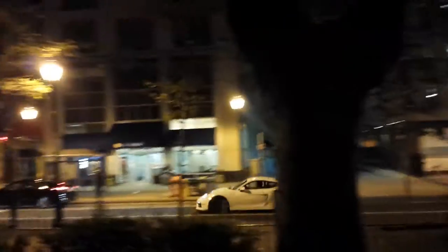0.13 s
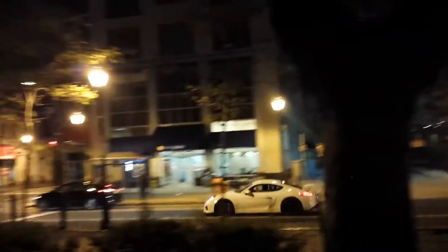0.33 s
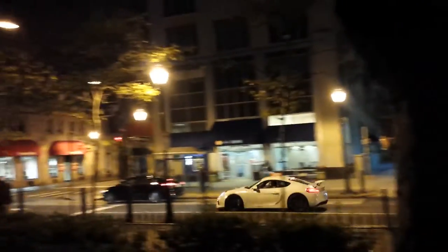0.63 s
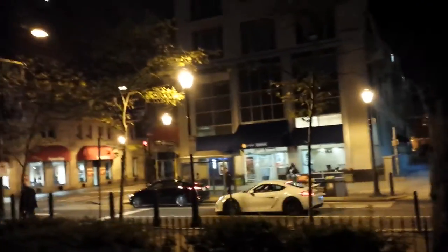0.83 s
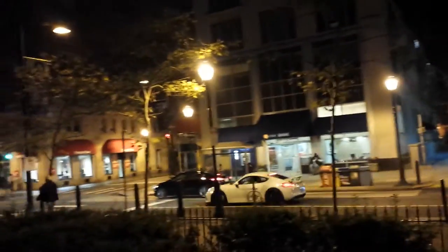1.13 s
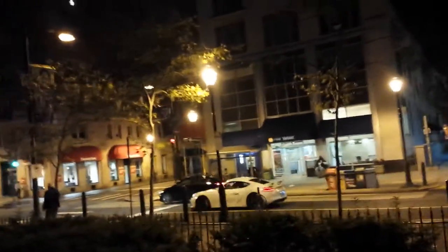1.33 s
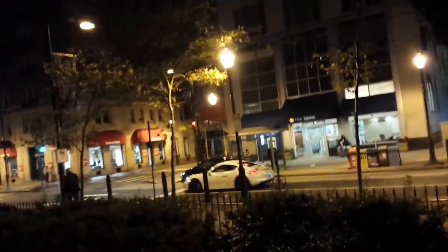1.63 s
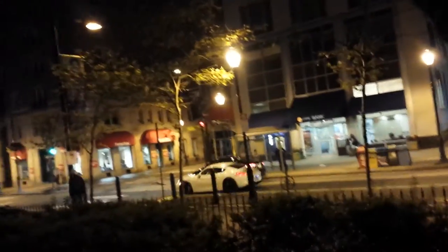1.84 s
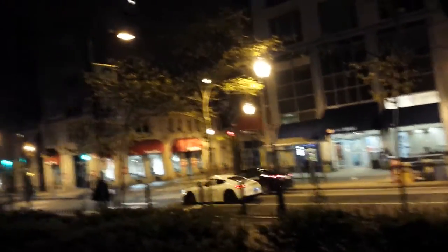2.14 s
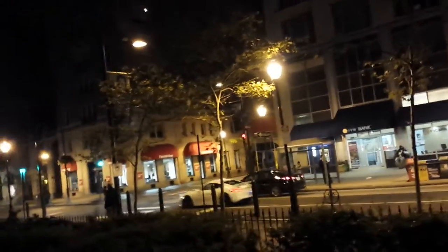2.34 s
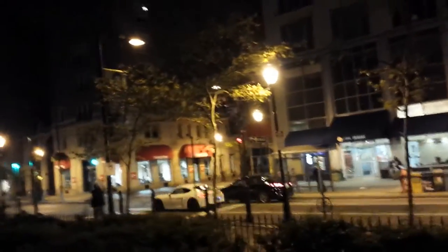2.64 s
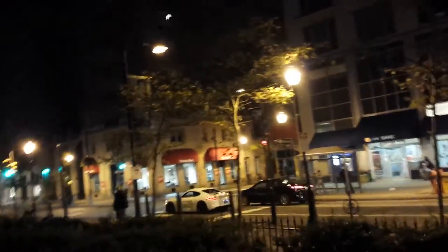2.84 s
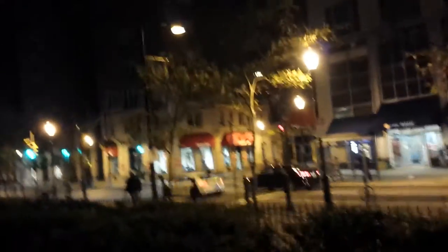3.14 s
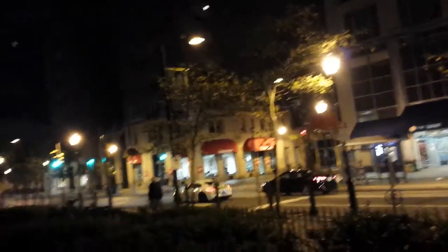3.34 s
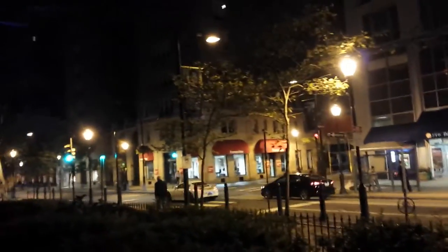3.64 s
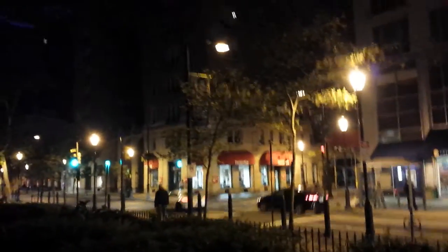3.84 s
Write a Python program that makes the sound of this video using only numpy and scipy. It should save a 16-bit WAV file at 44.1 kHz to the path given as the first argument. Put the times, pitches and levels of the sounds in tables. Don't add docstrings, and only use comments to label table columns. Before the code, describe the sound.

Quiet night street hum and tyre wash fade in, a faint cloth brush on the left, then a sports car barks three times, pops, and accelerates with climbing growl, echoing off buildings near a handheld stereo microphone.

```python
import sys
import numpy as np
from scipy import signal
from scipy.fft import rfft, irfft
from scipy.io import wavfile

SR = 44100
rng = np.random.default_rng(int(sys.argv[2]) if len(sys.argv) > 2 else 0)


def volts_from_db(level):
    exponent = np.asarray(level, float) / 20
    return 10 ** exponent


def to_wav(sig):
    pcm = np.clip(np.atleast_2d(sig), -1, 1) * 32767
    pcm = np.round(pcm).astype(np.int16)
    wavfile.write(sys.argv[1], SR, pcm.T)


N = 176400

# t/s, firing rate f/Hz, throttle level/dB
ENGINE = [(.4, 60.3, -38), (1.74, 48.12, -47), (1.81, 57.1, -26), (1.87, 69.77, -20), (1.95, 73.14, -27),
          (2.02, 66.33, -41), (2.14, 46.84, -41), (2.21, 48.52, -30.5), (2.36, 73.05, -26),
          (2.43, 79.06, -27.5), (2.47, 66.04, -40.5), (2.58, 56.14, -30), (2.68, 66.67, -26.5),
          (2.75, 63, -29.5), (2.83, 57.63, -29.5), (3.2, 65.32, -25), (3.6, 73.5, -23), (4, 83.68, -23.5)]
# multiple, level/dB
ORDERS = [(1, -1), (2, 2), (3, -10), (4, -9)]
CYLINDERS = [7, 2.5, 0, 6, 2, -3.5]
# f/Hz, level/dB
TAILPIPE = [(45, 5), (75, 1.6), (105, 1.5), (143, 0.5), (153, 6.5), (175, 6.5), (260, 4.5), (340, -0.5)]
# f/Hz, width/Hz, depth/dB
NULLS = [(58.7, 0.61, 3), (64.29, 0.62, 2), (76.47, 2.4, 3.5), (135.34, 2, 5.5), (142.3, 1.4, 7),
         (204, 10.5, 8), (296, 11, 3)]
# f/Hz, width/Hz, level/dB
EXHAUST_BOX = [(312, 68, 4.5), (420, 139, -1.6), (804, 84, -4.5), (1080, 150, -9), (1600, 335, -13.5)]
# firing rate f/Hz, span/Hz, pitch f/Hz, width/Hz, level/dB
PANELS = [(71.5, 2.16, 789, 106, -6.5), (67.2, 0.86, 1570, 57, -12), (76, 2.6, 1030, 130, -11.5),
          (60.4, 5.7, 300, 12, -7), (63, 5.3, 430, 14, -7.5), (60.3, 0.44, 890, 32, -7)]
# f/Hz, level/dB per Hz
GAS_RUSH = [(120, -36), (200, -11.5), (409, 2.5), (679, -10.5), (997, -8), (2800, -23.5), (6810, -18),
            (10900, -43.5), (13000, -47)]
# t/s, peak level/dB
RATTLES = [
    (1.8366, -32),
    (1.8669, -19),
    (1.8811, -22),
    (1.895, -21),
    (1.921, -31),
    (2.555, -29.5),
    (2.6367, -27),
]
# f/Hz, level/dB, t60/s
SHIELD = [(3950, -7.5, 0.019), (4900, -9, 0.013), (5560, 1, 0.013), (6050, -13, 0.021)]
# t/s, peak level/dB, f/Hz
POPS = [(1.806, -16, 420), (1.8375, -18, 700), (1.8662, -13.5, 476), (1.893, -6.5, 523),
        (1.912, -21.5, 1300), (1.932, -19.5, 1120), (1.943, -18, 420), (2.344, -21.5, 1180),
        (2.627, -24, 600), (2.914, -30, 495), (3.056, -39, 493), (3.114, -24.5, 1250), (3.2, -17.5, 615),
        (3.447, -24, 780), (3.474, -27, 793.8), (3.502, -18.5, 790), (3.585, -19, 716), (3.624, -16, 396),
        (3.663, -12, 399.7), (3.703, -17, 605.4), (3.842, -26, 910), (3.88, -24, 700.4),
        (3.916, -25, 700.8)]
# t/s, f/Hz, peak level/dB, t60/s
TINKS = [
    (2.544, 2120, -31, 0.055),
    (2.548, 1430, -35, .06),
    (2.543, 4610, -35, .1),
    (2.945, 1600, -32.5, 0.1),
    (3.01, 1600, -30.5, 0.077),
    (3.378, 1560, -25.5, 0.11),
]
PUFF_TIMES = [1.885, 1.96, 2.36, 2.68, 3.362, 3.893, 1.16, 2.9, 1.715, 3.17, 1.99]
# half length/s, level/dB, sizzle level/dB
PUFFS = [(0.04, -39, -70), (0.11, -34, -69), (0.11, -38, -68), (0.083, -37, -74), (0.028, -24, -43),
         (0.016, -37, -54), (.03, -47, -55), (0.031, -61, -58), (0.025, -48, -56), (0.032, -60, -61),
         (.025, -46, -57)]
# f/Hz, level/dB per Hz
PUFF_HISS = [(1500, 14), (3000, 4), (5800, 12.5), (8000, 1.5), (10500, -49), (12500, -36)]
# start t/s, length/s, level/dB
SQUEAKS = [
    (0.803, 0.096, -48),
    (2.397, 0.1, -47.5),
    (3.05, 0.12, -50),
    (3.247, 0.11, -48),
    (3.5, .08, -61),
    (3.683, 0.09, -51),
    (3.933, 0.077, -50),
]
# t/s, peak level/dB, left-right level/dB
TICKS = [
    (1.5995, -24, -2),
    (3.89, -34, -6),
]
# t/s, f/Hz, level/dB
COASTING = [
    [(.45, 70, -55), (.75, 67.8, -46), (1.0, 61, -41), (1.12, 56, -59)],
    [(1.12, 78, -71), (1.2, 78.1, -31.5), (1.42, 76, -41), (1.62, 63.8, -54.5), (1.78, 63, -41)],
    [(.5, 141.8, -63), (.9, 138.5, -41), (1.02, 138, -30), (1.13, 148, -29.5), (1.22, 141, -74)],
    [(.6, 122.3, -64), (.82, 121.3, -36.5), (1.25, 119.4, -49), (1.7, 115, -64), (1.8, 116, -47)],
]
# f/Hz, level/dB per Hz
STREET = [(15, -45), (25, -67), (55, -7), (130, -2.5), (411, -16.5), (534, -15.5), (3160, -30), (6580, -30),
          (13000, -87)]
# f/Hz, width/Hz, level/dB
HOLLOW = [(284, 17.4, -42), (408, 30, -42), (194, 36, -41)]
# f/Hz, likeness (-1 to 1)
LIKENESS = [(60, 1), (130, 0.95), (280, 0.87), (620, 0.56), (1350, -0.22), (2930, 0.086), (6370, 0.069),
            (13900, -0.58)]
# f/Hz, left-right level/dB
PORTS = [(60, -1.5), (110, -2), (200, -2.0), (370, -2.5), (670, -1), (1230, -2.0), (2260, -1), (4140, -3.5),
         (7570, -8.5), (13900, -14.5)]

UPPER_FADE_HZ, UPPER_FADE_DB_PER_HZ = 68.9, 2.5
PIPE_BUILD_S, NULL_LAG_S = 0.091, 0.038
BARK_DB, BARK_SPREAD_DB, BARK_JITTER, BARK_CUT_HZ = -7, 3.5, 0.16, 2060
SNARL_DB_PER_HZ_PER_S, SNARL_LAG_S = 0.027, 0.028
PANEL_BEAT = 1.9
RUSH_DB, RUSH_FOLLOWS, RUSH_GATE = -7, 1.19, 0.4
POP_T60_S = 0.016
SQUEAK_HZ, SQUEAK_WIDTH_HZ, SQUEAK_EDGE_S, SQUEAK_TAIL_S, SQUEAK_TAIL = 10570, 220, 0.022, 0.17, 0.63
RUSTLE_S, RUSTLE_HALF_S, RUSTLE_PER_S, RUSTLE_DB, RUSTLE_LEFT_DB = 1.21, 0.12, 900, -46, 10
STREET_DB = -29.5
TYRE_S, TYRE_HALF_S, TYRE_DB, TYRE_BAND_HZ = 0.56, 0.86, -36.5, [637, 1590]
TYRE_HISS_DB, TYRE_HISS_HZ, TYRE_HISS_LAG_S = -9, 5800, 0.16
FACADE_DB, FACADE_T60_S, FACADE_LOW_HZ = -1.5, 0.42, 650
TOP_CUT_HZ = 11600
FADE_START_S, FADE_S, MIC_LOW_HZ = 0.419, 0.29, 32.2


def engine():
    rate, throttle_db = in_time(ENGINE)
    turns = np.cumsum(rate) / SR
    barks = exhaust_barks(rate, throttle_db, turns) + box_panels(rate, throttle_db, turns)
    tones = volts_from_db(throttle_db) * pipe_tones(rate, turns)
    return -tones + barks + facades(barks) + gas_rush(throttle_db, turns)


def pipe_tones(rate, turns):
    tones = 0
    for k, db in ORDERS:
        pipe_db = lag(at_hz(TAILPIPE, k * rate), PIPE_BUILD_S)
        lost_db = lag(nulls_db(k * rate), NULL_LAG_S)
        if k > 2:
            lost_db = lost_db + UPPER_FADE_DB_PER_HZ * np.maximum(rate - UPPER_FADE_HZ, 0)
        wobble_db = (1.0 if k <= 2 else 2.5) * drift(9.3)
        tones = tones + volts_from_db(db + pipe_db - lost_db + wobble_db) * np.cos(2 * np.pi * k * turns)
    return tones


def exhaust_barks(rate, throttle_db, turns):
    count = np.floor(2 * turns + BARK_JITTER * drift(40)).astype(int)
    fired = np.diff(count, prepend=0) > 0
    chance_db = BARK_SPREAD_DB * np.clip(rng.standard_normal(N), -2, 1.5)
    knocks = fired * volts_from_db(np.array(CYLINDERS)[count % 6] + chance_db)
    knocks = signal.lfilter(*signal.butter(2, BARK_CUT_HZ, fs=SR), knocks)
    box = 0
    for k, (hz, width_hz, db) in enumerate(EXHAUST_BOX):
        box = box + (-1) ** k * volts_from_db(db) * peak(knocks, hz, width_hz)
    climb = np.maximum(np.gradient(rate) * SR, 0)
    snarl_db = SNARL_DB_PER_HZ_PER_S * lag(climb, SNARL_LAG_S)
    return volts_from_db(throttle_db + BARK_DB + snarl_db) * rms_one(box)


def box_panels(rate, throttle_db, turns):
    air = rng.standard_normal(N) * np.exp(PANEL_BEAT * np.cos(2 * np.pi * turns) / 2)
    out = 0
    for speed, span, hz, width_hz, db in PANELS:
        awake = np.exp(-((rate - speed) / span) ** 2)
        out = out + volts_from_db(throttle_db + db) * awake * rms_one(peak(air, hz, width_hz))
    return out


def gas_rush(throttle_db, turns):
    gate = 1 + RUSH_GATE * np.cos(2 * np.pi * turns)
    level_db = RUSH_DB - 18.5 + RUSH_FOLLOWS * (throttle_db + 21.5)
    return volts_from_db(level_db) * gate * banded_noise(GAS_RUSH, patchy_db=1, low_hz=160.8)


def clatter():
    out = np.zeros(N + SR)
    rattle_s, rattle_db = np.transpose(RATTLES)
    for hz, level_db, t60 in SHIELD:
        clicks = np.zeros(N + SR)
        clicks[(rattle_s * SR).astype(int)] = volts_from_db(rattle_db + level_db + rng.normal(0, 2.0, len(rattle_s)))
        out += ring(clicks, hz, t60)
    click = np.arange(SR // 4) == 0
    for s, db, hz in POPS:
        octaves = ring(click, hz * 2, POP_T60_S) + ring(click, hz * 0.5, POP_T60_S)
        out[int(s * SR):][:len(click)] += volts_from_db(db) * (ring(click, hz, POP_T60_S) + 0.5 * octaves)
    soft_start = lag(np.ones(len(click)), 0.0019)
    for s, hz, db, t60 in TINKS:
        out[int(s * SR):][:len(click)] += volts_from_db(db) * soft_start * ring(click, hz, t60)
    return out[:N] + facades(out[:N])


def puffs():
    high = signal.butter(4, 10000, "high", fs=SR, output="sos")
    sizzle = rms_one(signal.sosfilt(high, rng.standard_normal((2, N))))
    body = without_top(banded_noise(PUFF_HISS, patchy_db=-0.5, low_hz=1226.0))
    out = 0
    for s, (half, db, sizzle_db) in zip(PUFF_TIMES, PUFFS):
        out = out + bump(s, half) * (volts_from_db(db) * body + volts_from_db(sizzle_db) * sizzle)
    return out


def squeaks():
    t = np.arange(N) / SR
    gain = 0
    for s, length, db in SQUEAKS:
        inside_s = np.minimum(t - s, s + length - t)
        gain = gain + volts_from_db(db) * np.clip(inside_s / SQUEAK_EDGE_S + 0.5, 0, 1)
    gain = np.maximum(gain, SQUEAK_TAIL * 2 * lag(gain, SQUEAK_TAIL_S))
    whistle = rng.standard_normal((2, N))
    for _ in range(2):
        whistle = peak(whistle, SQUEAK_HZ, SQUEAK_WIDTH_HZ)
    return 0.83 * gain * rms_one(whistle)


def handling():
    grains = (rng.random(N) < RUSTLE_PER_S / SR) * rng.choice([-1, 1], N)
    grains = grains * volts_from_db(3.8 * np.minimum(rng.exponential(1, N), 4))
    sides = volts_from_db(np.array([[RUSTLE_LEFT_DB], [-RUSTLE_LEFT_DB]]) / 2)
    cloth = rms_one(without_top(peak(grains, 6400.0, 2500.0))) * sides
    ticks = np.zeros((2, N))
    for s, db, pan_db in TICKS:
        ticks[:, int(s * SR)] = volts_from_db(db + 4.5 + np.array([pan_db, -pan_db]) / 2)
    return volts_from_db(RUSTLE_DB) * bump(RUSTLE_S, RUSTLE_HALF_S) * cloth + peak(ticks, 12500.0, 6000.0)


def coasting():
    out = 0
    for rows in COASTING:
        start = (rows[0][0] - 0.05, rows[0][1], -90)
        end = (rows[-1][0] + 0.05, rows[-1][1], -90)
        hz, db = in_time([start] + list(rows) + [end])
        out = out + volts_from_db(db + 3 + 1.5 * drift(7)) * np.sin(2 * np.pi * np.cumsum(hz) / SR)
    return out


def traffic():
    hum = volts_from_db(STREET_DB) * banded_noise(STREET, patchy_db=1.06, low_hz=21.77)
    hollow = 0
    for hz, width_hz, db in HOLLOW:
        hollow = hollow + volts_from_db(db + 0.47 * drift(1.2)) * rms_one(peak(rng.standard_normal(N), hz, width_hz))
    band = signal.butter(2, TYRE_BAND_HZ, "band", fs=SR, output="sos")
    left, right, shared = signal.sosfilt(band, rng.standard_normal((3, N)))
    roar = rms_one(np.array([left, right]) + 0.27 * shared)
    hiss = rms_one(peak(rng.standard_normal((2, N)), TYRE_HISS_HZ, 1400.0))
    tyres = volts_from_db(TYRE_DB) * bump(TYRE_S, TYRE_HALF_S) * roar
    tyres += volts_from_db(TYRE_DB + TYRE_HISS_DB) * bump(TYRE_S + TYRE_HISS_LAG_S, TYRE_HALF_S) * hiss
    return hum + hollow + tyres


def facades(x):
    t = np.arange(SR // 3) / SR
    sparse = rng.random((2, len(t))) < 0.02
    echoes = rng.standard_normal((2, len(t))) * sparse * volts_from_db(-60 * t / FACADE_T60_S)
    echoes /= np.sqrt((echoes ** 2).sum(axis=1, keepdims=True))
    bright = signal.lfilter(*signal.butter(2, FACADE_LOW_HZ, "high", fs=SR), x)
    return volts_from_db(FACADE_DB) * signal.fftconvolve(bright[None], echoes, axes=1)[:, :N]


def nulls_db(hz):
    return sum(depth_db * np.exp(-((hz - centre) / width) ** 2) for centre, width, depth_db in NULLS)


def without_top(x):
    return signal.sosfilt(signal.butter(8, TOP_CUT_HZ, fs=SR, output="sos"), x)


def banded_noise(spectrum, patchy_db, low_hz):
    edges = low_hz * 2 ** np.arange(0, np.log2(15000 / low_hz), 0.5)
    white = rng.standard_normal((2, 2, N))
    out = 0
    for k, (low, high) in enumerate(zip(edges, edges[1:])):
        band = signal.butter(2, [low, high], "band", fs=SR, output="sos")
        mid, side = signal.sosfilt(band, white[k % 2])
        hz = np.sqrt(low * high)
        alike = np.clip(at_hz(LIKENESS, hz), -1, 1)
        stereo = np.sqrt(1 + alike) * mid + np.sqrt(1 - alike) * side * [[1], [-1]]
        out = out + volts_from_db(at_hz(spectrum, hz) + patchy_db * drift(6.4)) * stereo
    return rms_one(out)


def peak(x, hz, width_hz):
    r = np.exp(-np.pi * width_hz / SR)
    poles = [1, -2 * r * np.cos(2 * np.pi * hz / SR), r * r]
    return signal.lfilter([(1 - r * r) / 2, 0, (r * r - 1) / 2], poles, x + 1e-18)


def ring(clicks, hz, t60):
    r, w = volts_from_db(-60 / (t60 * SR)), 2 * np.pi * hz / SR
    return signal.lfilter([0, np.sin(w)], [1, -2 * r * np.cos(w), r * r], clicks + 1e-18)


def drift(rate):
    r = np.exp(-80 * np.pi * rate / SR)
    slow = signal.lfilter([1], [1, -2 * r, r * r], rng.standard_normal(N // 40 + 2002))[2000:]
    return np.interp(np.arange(N) / 40, np.arange(len(slow)), rms_one(slow))


def lag(x, seconds):
    r = np.exp(-1 / (seconds * SR))
    return signal.lfilter([1 - r], [1, -r], x)


def bump(centre, half):
    return np.exp(-((np.arange(N) / SR - centre) / half) ** 2)


def rms_one(x):
    return x / np.sqrt(np.mean(x ** 2) + 1e-20)


def at_hz(points, hz):
    p = np.array(points, float)
    return np.interp(np.log(hz), np.log(p[:, 0] + 1), p[:, 1])


def in_time(rows):
    s, *columns = np.transpose(rows)
    return [np.interp(np.arange(N) / SR, s, c) for c in columns]


def scene():
    distant = without_top(engine() + clatter() + coasting()) + without_top(traffic())
    return distant + puffs() + squeaks() + handling()


def roll_off(x):
    return signal.sosfilt(signal.butter(12, 14460, fs=SR, output="sos"), x)


def record(dry):
    tilt_db = at_hz(PORTS, np.fft.rfftfreq(N, 1 / SR) + 1) / 2
    wet = irfft(rfft(dry) * volts_from_db(np.array([tilt_db, -tilt_db])), N)
    wet = signal.lfilter(*signal.butter(2, MIC_LOW_HZ, "high", fs=SR), wet)
    fade = np.clip((np.arange(N) / SR - FADE_START_S) / FADE_S, 0, 1)
    return roll_off(wet * fade)


dry = scene()
out = record(dry)
to_wav(out)
```